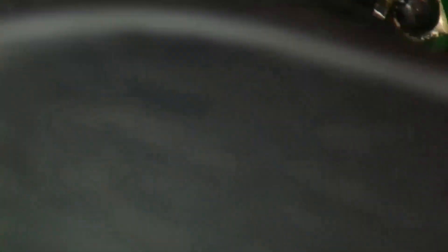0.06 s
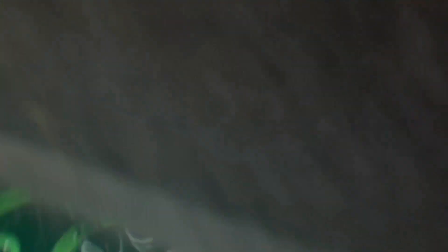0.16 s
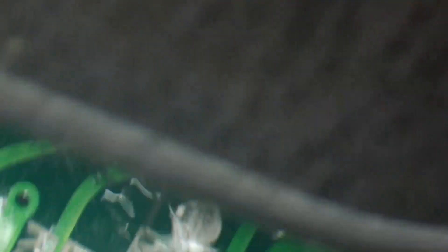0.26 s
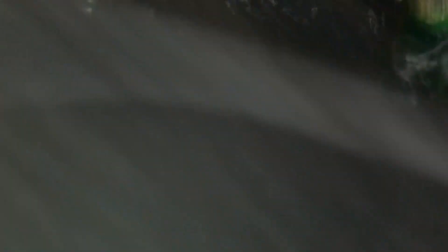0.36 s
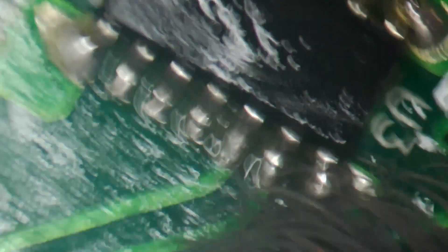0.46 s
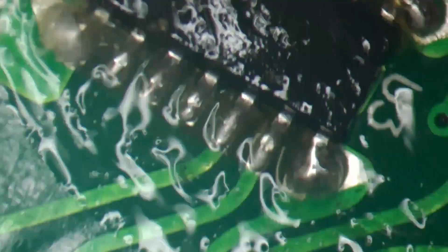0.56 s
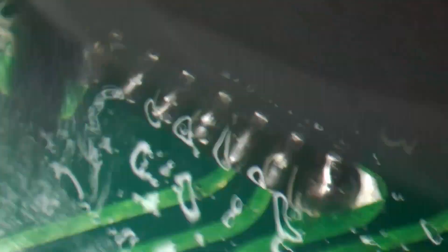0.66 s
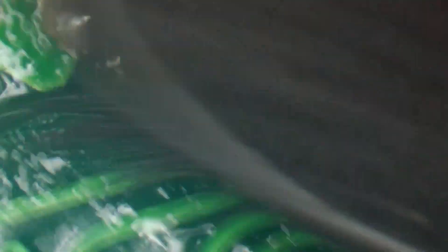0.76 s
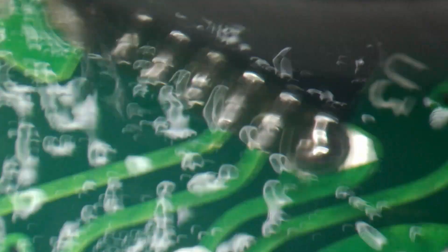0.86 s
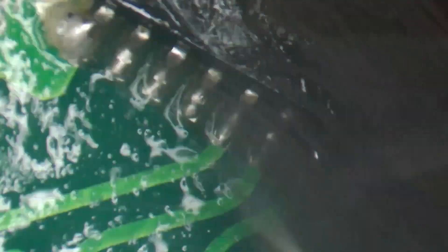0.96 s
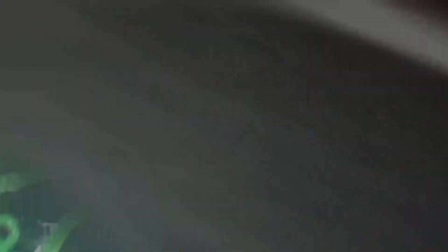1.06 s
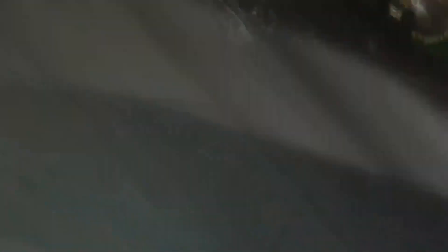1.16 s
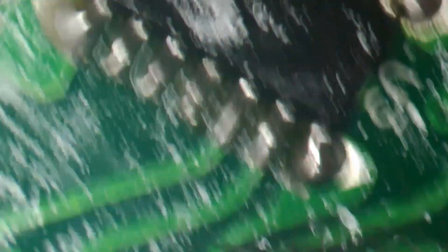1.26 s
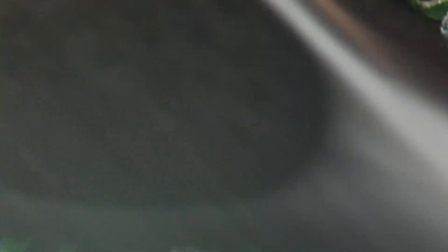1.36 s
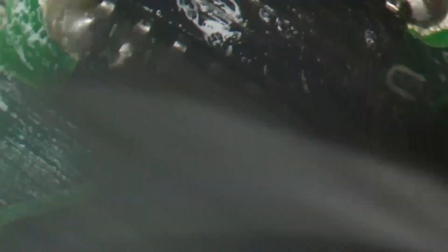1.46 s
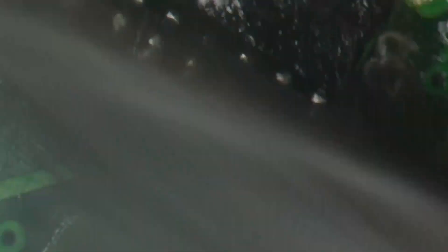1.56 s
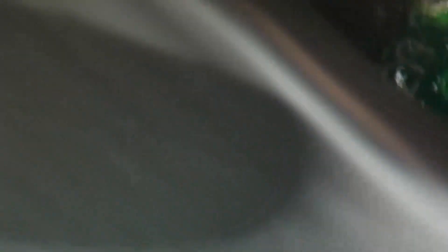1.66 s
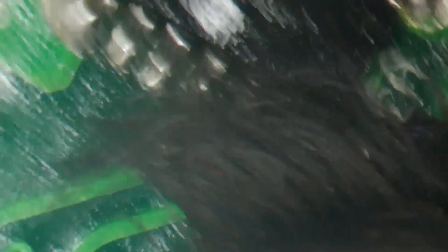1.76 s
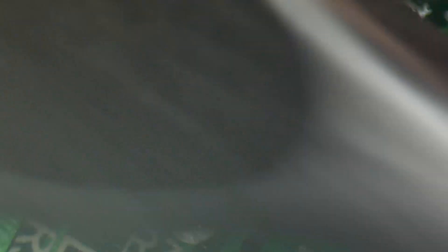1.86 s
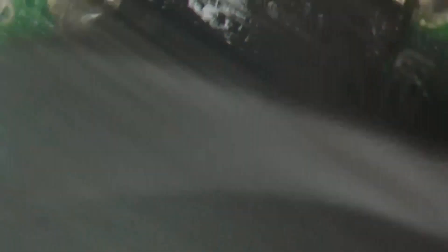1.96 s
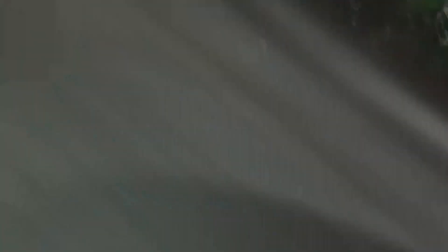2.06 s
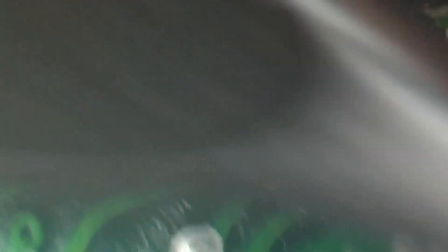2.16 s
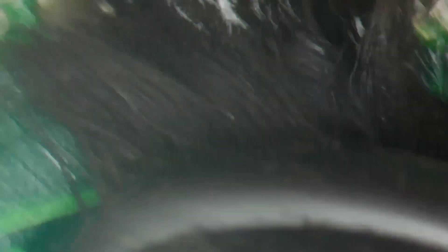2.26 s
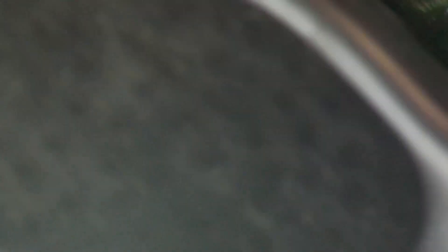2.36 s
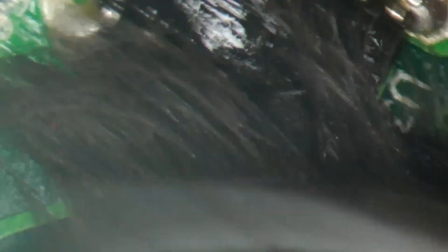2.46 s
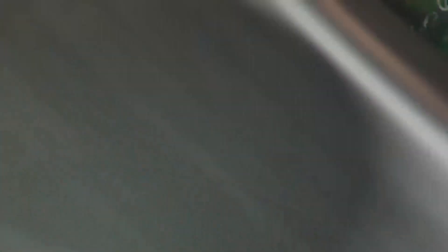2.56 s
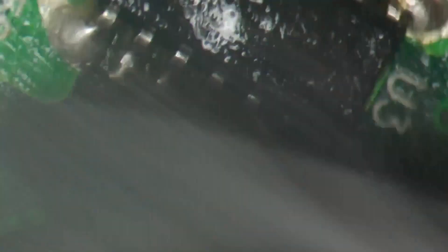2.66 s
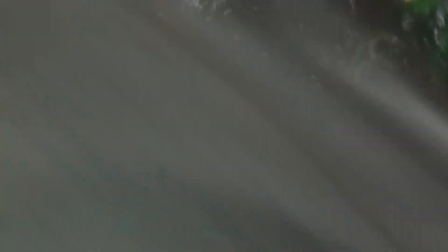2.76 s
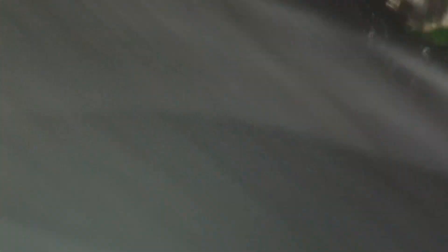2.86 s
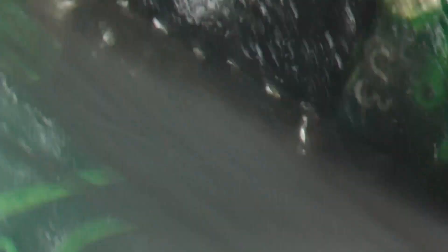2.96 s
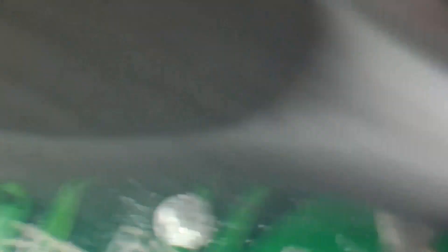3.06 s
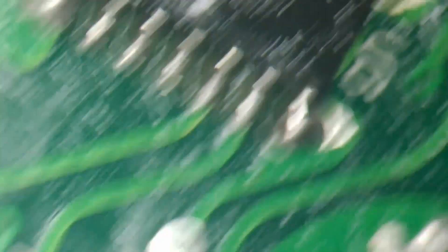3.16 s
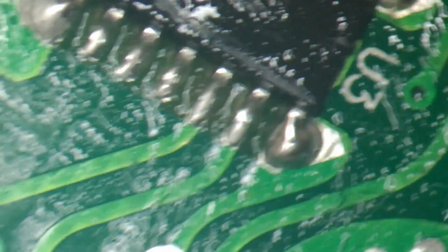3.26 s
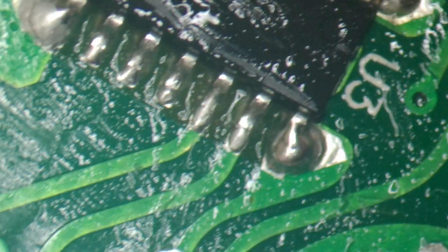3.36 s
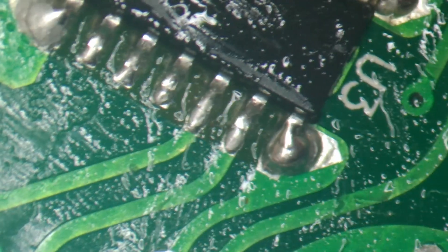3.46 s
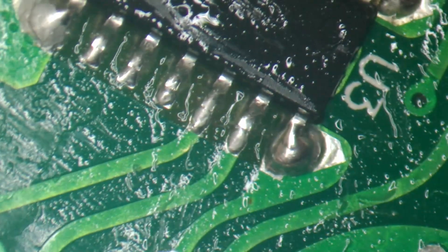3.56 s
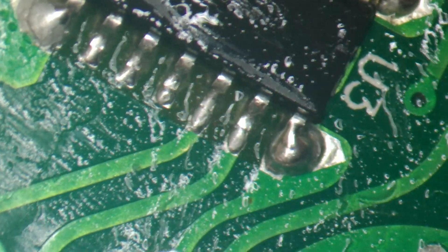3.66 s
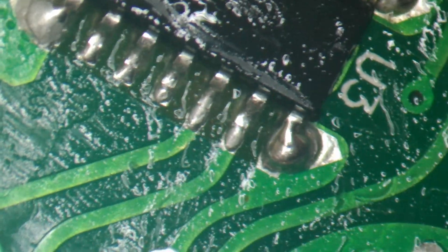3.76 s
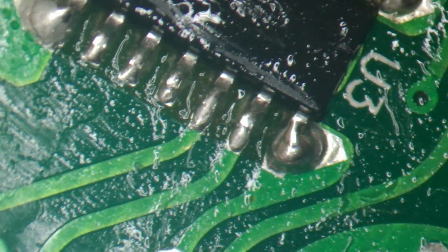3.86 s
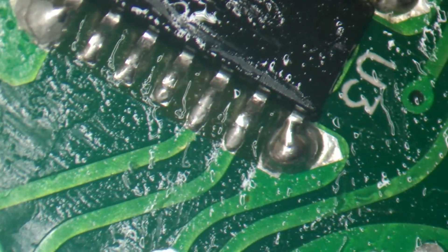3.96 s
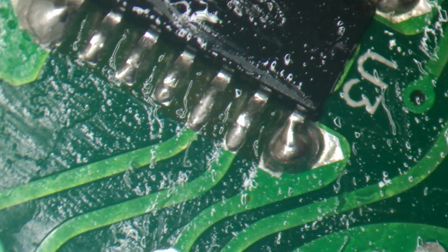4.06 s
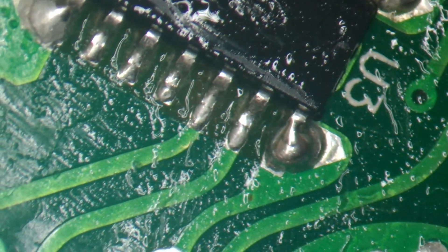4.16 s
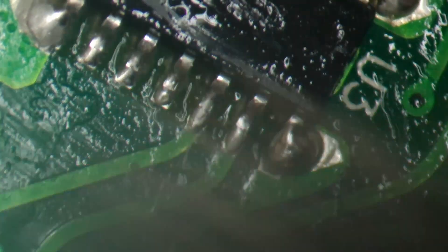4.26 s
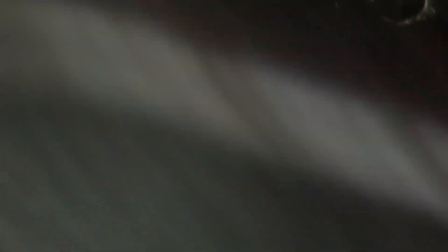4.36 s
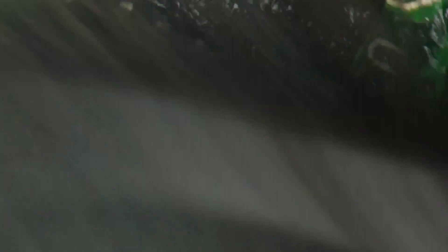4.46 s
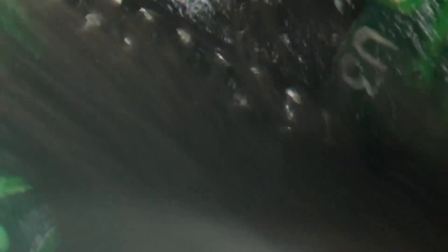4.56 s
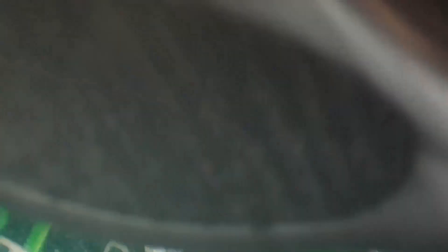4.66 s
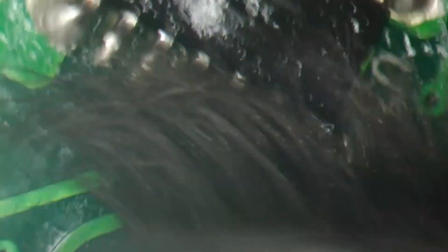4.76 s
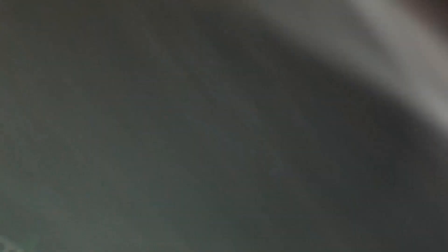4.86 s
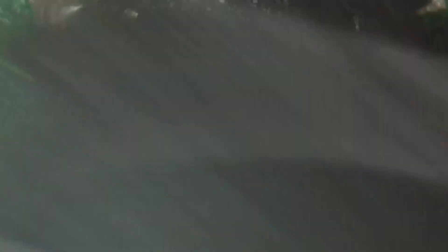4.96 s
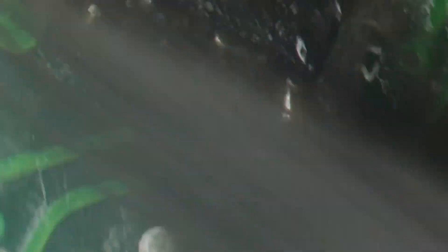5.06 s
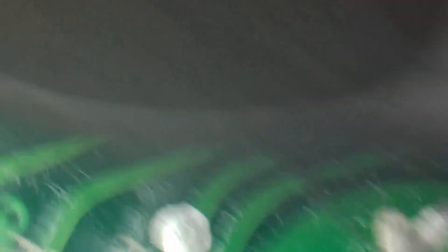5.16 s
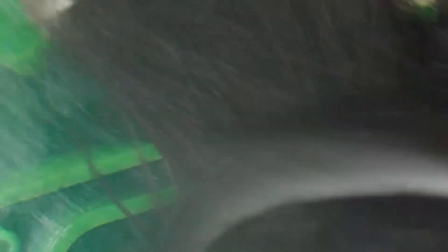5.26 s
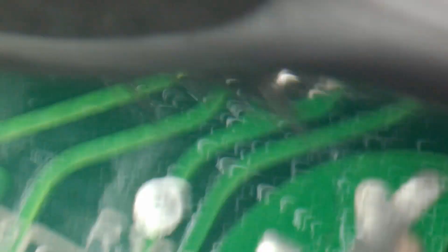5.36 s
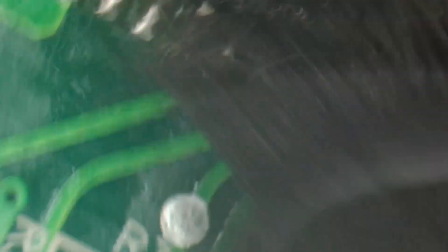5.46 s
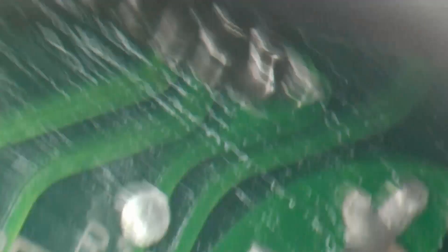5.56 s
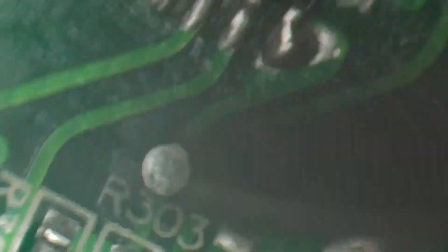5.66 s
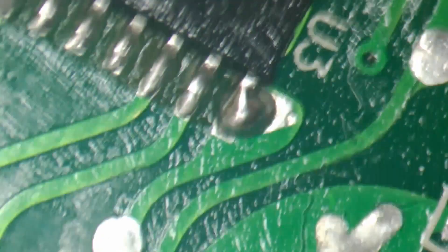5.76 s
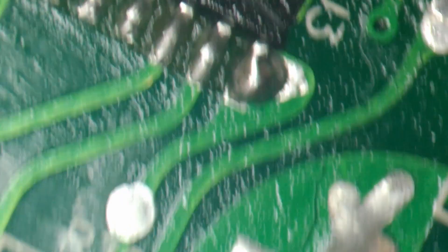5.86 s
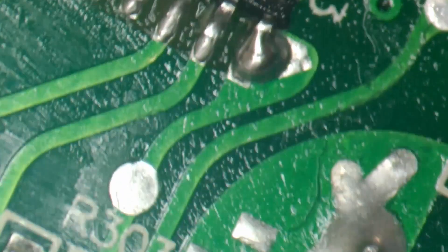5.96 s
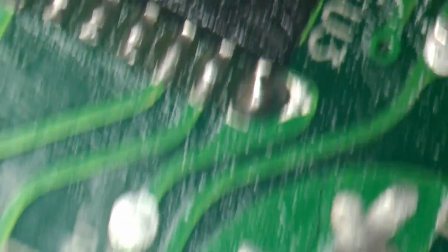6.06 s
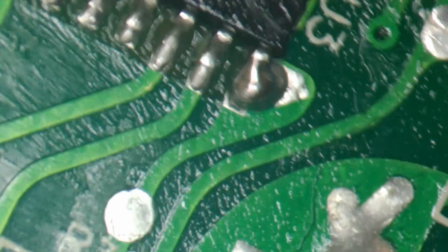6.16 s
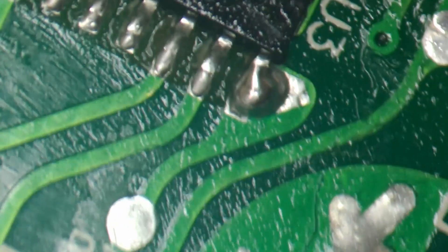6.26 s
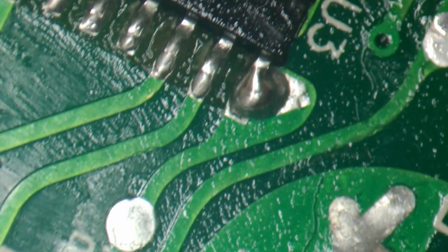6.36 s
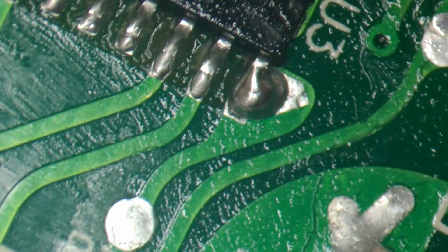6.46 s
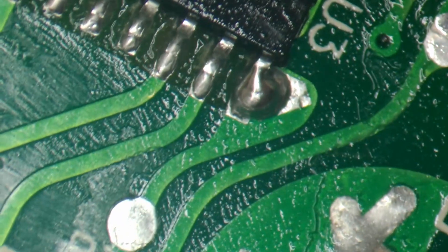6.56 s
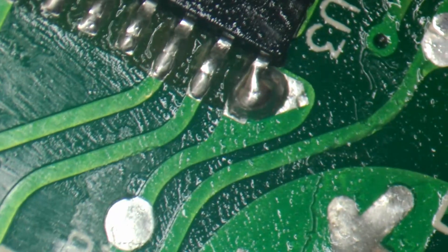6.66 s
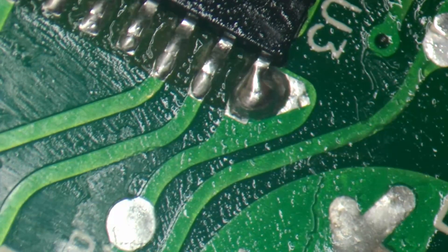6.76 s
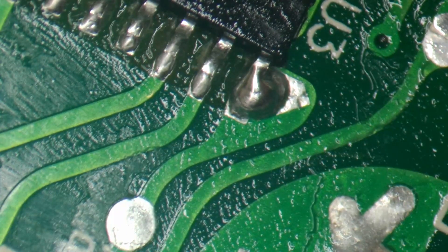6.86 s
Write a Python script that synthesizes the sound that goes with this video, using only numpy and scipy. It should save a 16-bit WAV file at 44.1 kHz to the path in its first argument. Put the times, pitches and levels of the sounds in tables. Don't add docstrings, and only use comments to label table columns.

```python
import sys
import numpy as np
from scipy import signal
from scipy.fft import rfft, irfft, next_fast_len
from scipy.io import wavfile
from scipy.ndimage import uniform_filter1d

SR = 44100
rng = np.random.default_rng(int(sys.argv[2]) if len(sys.argv) > 2 else 0)


def boost_factor(decibels):
    exponent = np.asarray(decibels, float) / 20
    return 10 ** exponent


def master(y):
    cut = np.clip(np.atleast_2d(y).T, -1, 1)
    pcm = np.round(cut * 32767)
    wavfile.write(sys.argv[1], SR, pcm.astype(np.int16))


N = 304731
TIME = np.arange(N) / SR


def rms_one(x):
    return x / np.sqrt(np.mean(x ** 2) + 1e-20)


def evened(x, span_s):
    return rms_one(x / np.sqrt(uniform_filter1d(x ** 2, size=int(span_s * SR)) + 1e-12))


def bandpass(x, order, edges_hz):
    return signal.sosfilt(signal.butter(order, edges_hz, "band", fs=SR, output="sos"), x)


def colour(x, points):
    size = next_fast_len(N + SR // 4)
    hz, db = np.transpose(points)
    grid = np.maximum(np.arange(size // 2 + 1) * SR / size, 1)
    cepstrum = irfft(np.log(boost_factor(np.interp(np.log(grid), np.log(hz), db))), size)
    cepstrum[1:size // 2] *= 2
    cepstrum[size // 2 + 1:] = 0
    return irfft(rfft(x, size) * np.exp(rfft(cepstrum)), size)[:N]


def resonance(x, hz, width_hz):
    r = np.exp(-np.pi * width_hz / SR)
    poles = [1, -2 * r * np.cos(2 * np.pi * hz / SR), r * r]
    return signal.lfilter([(1 - r * r) / 2, 0, (r * r - 1) / 2], poles, x + 1e-18)


def flutter(rate_hz, depth_db):
    lowpass = signal.butter(2, rate_hz, fs=SR / 32, output="sos")
    slow = rms_one(signal.sosfilt(lowpass, rng.standard_normal(N // 32 + 2)))
    return boost_factor(depth_db * np.interp(np.arange(N) / 32, np.arange(len(slow)), slow))


def body(x, modes, wander_db=0):
    out = np.zeros(N)
    for k, (hz, width_hz, db) in enumerate(modes):
        out += (-1) ** k * boost_factor(db) * resonance(x * flutter(9, wander_db), hz, width_hz)
    return out


def flicks(per_s, spread_db):
    sizes = boost_factor(spread_db * np.minimum(rng.exponential(1, N), 5)) * rng.choice([-1, 1], N)
    return rms_one(sizes * (rng.random(N) < per_s / SR))


# frequency in Hz, density in dB per Hz.
FLOOR = [(94, -28), (160, -8.5), (231, -8), (366, -8), (436, -15), (666, -17), (719, -22), (872, -17.5),
         (1100, -21.5), (2570, -23.5), (4000, -23.5), (4900, -27), (5600, -23.5), (7840, -24), (9700, -27),
         (10500, -32), (11400, -27.5), (16000, -33)]


def hush():
    return boost_factor(-67) * rms_one(colour(rng.standard_normal(N), FLOOR)) * flutter(8, depth_db=.3)


# time in seconds, level in dB.
ARM_WEIGHT = [(0, -67), (.6, -68), (.9, -62.5), (3.2, -60.5), (3.55, -66.5), (3.8, -69.5), (4.4, -68),
              (4.7, -65), (5.85, -56.5), (6.0, -62), (6.15, -59), (6.25, -66.5), (6.91, -62)]
# time in seconds, bench top level in dB, frame level re top in dB.
SHOVES = [(.25, -64, -1), (.4, -64, -2), (.75, -51.5, -6.5), (.84, -48, -11), (1.06, -48, -18),
          (1.22, -49.5, -2), (1.37, -57.5, -3), (1.5, -57, -0.5), (1.59, -48.5, -10), (1.73, -58, -1),
          (1.84, -49.5, -5), (2.0, -55, -4), (2.15, -57, -9), (2.329, -45, -3), (2.579, -47.5, -12),
          (2.8, -47, -19), (3.02, -46, -17), (3.27, -50, -7), (4.66, -56.5, -5), (4.79, -47.5, 0),
          (4.89, -54.5, -7), (5.0, -50, -2.5), (5.14, -49.5, -12), (5.25, -50, -16), (5.33, -49.5, -10),
          (5.43, -50, -10), (5.61, -41.5, -14), (5.79, -45, 4.5), (6.72, -49, -21), (6.81, -48, -27)]
# frequency in Hz, width in Hz, level in dB.
BENCH_TOP = [(136.3, 24.4, 10.5), (191, 73, -7), (277, 86, -16)]
# frequency in Hz, width in Hz, level in dB.
BENCH_FRAME = [(37.5, 23, -15.5), (58, 5.4, -2.5), (77, 30.5, -6.5)]


def bench():
    rise_db_per_s, fall_db_per_s, frame_lingers = 256, 193, 0.62
    lean = boost_factor(np.interp(TIME, *np.transpose(ARM_WEIGHT)))
    top_power = (boost_factor(-4) * lean) ** 2
    frame_power = lean ** 2
    for s, top_db, frame_db in SHOVES:
        near = slice(max(int((s - .25) * SR), 0), int((s + .35) * SR))
        ago = TIME[near] - s
        loss_db = np.where(ago < 0, -rise_db_per_s, fall_db_per_s) * ago
        top_power[near] += boost_factor(top_db - loss_db) ** 2
        frame_power[near] += boost_factor(top_db + frame_db - frame_lingers * loss_db) ** 2
    top = evened(body(flicks(500., spread_db=2.0), BENCH_TOP), span_s=0.22)
    frame = evened(body(flicks(500., spread_db=2.0), BENCH_FRAME), span_s=0.22)
    return np.sqrt(top_power) * top + np.sqrt(frame_power) * frame


# time in seconds, level in dB.
NUDGES = [
    [(0.08, -82), (0.256, -58), (0.288, -65.5), (0.354, -55.5), (0.364, -44), (0.394, -64.5),
     (0.452, -67.5), (0.478, -98.5), (0.5, -77)],
    [(5.92, -76), (6.032, -76), (6.052, -65), (6.092, -80), (6.124, -58), (6.13, -67), (6.182, -58.5),
     (6.216, -81), (6.4, -80)],
]
# frequency in Hz, density in dB per Hz.
DRAG_SPECTRA = [
    [(150, -52), (250, -29), (360, -0.5), (449, -20), (513, -11.5), (1440, -5.5), (2590, -22.5),
     (3060, -16), (5020, -30), (9000, -30), (11700, -37), (19800, -120)],
    [(150, -49), (250, -8), (323, -2), (398, -12), (442, -9), (770, -16), (1700, 0.5), (2370, -24.5),
     (3150, -7.5), (9000, -30.5), (11700, -54), (19800, -120)],
]


def slides():
    grit = flicks(1500., spread_db=3.0)
    out = np.zeros(N)
    for rows, spectrum in zip(NUDGES, DRAG_SPECTRA):
        gain = boost_factor(np.interp(TIME, *np.transpose(rows), left=-120, right=-120))
        out += rms_one(colour(grit, spectrum)) * gain
    return out


def room(x):
    t60_s, wall_cut_hz = 0.27, 9300
    size = next_fast_len(N + SR)
    turn = -2j * np.pi * np.arange(size // 2 + 1) / size
    wall = 1 / (1 - turn * SR / (2 * np.pi * wall_cut_hz))
    response = 0
    for k, lag_s in enumerate(rng.uniform(.011, .04, 10)):
        loop = boost_factor(-60 * lag_s / t60_s) * wall * np.exp(turn * lag_s * SR)
        response = response + (-1) ** k * loop / (1 - loop)
    return irfft(rfft(x, size) * response, size)[:N]


# time in seconds, peak in dB, low weight in dB,
# brightness of the tick in dB.
CATCHES = [(.361, -41, -9, -8), (.502, -58, -18, 11), (.719, -28.5, -13, 2), (.818, -28.5, -21, -6),
           (1.001, -31.5, -22, 0), (1.049, -28, -18, 3), (1.186, -36.5, -21, -4), (1.208, -34, -27, -5),
           (1.369, -35, -24, 0), (2.097, -39.5, -22, 2), (2.174, -39, -33, 10), (2.22, -36, -27, 0),
           (2.287, -31, -18, -6), (2.296, -33, -8, -8), (2.314, -40.5, 1.5, 0), (2.324, -40.5, 6, -5),
           (2.503, -35.5, -7, 0.5), (2.698, -37, -36, 0), (2.816, -34, -32, 0), (2.902, -35, -18, 0),
           (2.929, -33, -23, 4), (3.242, -40, -9, 0), (4.666, -37.5, -14, -3), (4.73, -31, -17, -2),
           (4.86, -41, -17, -1), (4.986, -31, -29, 5), (5.233, -35, -17, 0), (5.244, -32, -24, -3),
           (5.526, -33.5, -13, 2), (5.559, -26, -14, -3), (5.741, -26, -12.5, 6), (5.751, -25, -13, -6),
           (5.794, -23, -18, -1), (5.798, -23, -18, 10), (5.81, -32, -17, -3), (6.119, -44, -46, -2)]
# frequency in Hz, width in Hz, level in dB.
BOARD = [(917, 136, -3), (998, 146, 1.3), (1193, 46, -4), (1373, 50, -3.5), (1572, 270, -12),
         (1852, 130, -5), (2080, 123, -1), (2540, 310, -4.5), (2594, 290, -9), (3100, 370, -9.5)]
# frequency in Hz, width in Hz, level in dB.
HANDLE = [(245, 110, -5.5), (329.4, 62, 2), (397, 66, -5.5), (487, 86, -12.5), (666, 83, 1.5)]


def catches():
    tick_db, tick_follows, weight_blunts = -54.5, 0.41, 0.55
    sharp, heavy, tick = np.zeros((3, N))
    length = int(.05 * SR)
    t = TIME[:length]
    for s, db, low_db, bright_db in CATCHES:
        decay_s = 0.0026 * boost_factor(.5 * (db + 38.0))
        scrunch = rng.choice([-1, 1], length) * rng.uniform(.4, 1.39, length) * np.exp(-t / decay_s)
        this_tick_db = bright_db + tick_db + tick_follows * (db + 28) - weight_blunts * max(low_db + 15, 0)
        at = int(s * SR)
        sharp[at:][:length] += boost_factor(db) * scrunch
        heavy[at:][:length] += boost_factor(db + low_db) * scrunch
        tick[at:][:length] += boost_factor(this_tick_db) * scrunch * np.exp(-t / 0.0044)
    tick = bandpass(tick, 2, [1500, 9000])
    sharp = signal.sosfilt(signal.butter(1, 1150, fs=SR, output="sos"), sharp)
    return boost_factor(15) * body(sharp, BOARD) + boost_factor(20.0) * body(heavy, HANDLE) + boost_factor(6.5) * tick


# fastest moment in seconds, half length in seconds, hiss in dB, pressure on the pins in dB.
STROKES = [(0.562, 0.049, -62.5, 3.5), (0.722, 0.044, -56, 5), (0.836, 0.042, -55, 7),
           (0.985, 0.04, -56, 3.5), (1.09, 0.04, -53.5, 4.5), (1.228, 0.036, -53.5, 2),
           (1.365, 0.038, -57, 1.5), (1.496, 0.043, -53.5, 2), (1.622, 0.038, -56.5, 3),
           (1.75, 0.04, -53.5, 2.5), (1.872, 0.041, -55, 1), (1.999, 0.035, -53.5, 2.5),
           (2.119, 0.04, -54, 2.5), (2.24, 0.04, -53, 2), (2.357, .042, -56, 5.5),
           (2.488, 0.042, -57.5, 4.5), (2.598, 0.03, -54.5, 4.5), (2.711, 0.034, -54.5, 2.5),
           (2.824, 0.033, -53.5, 3), (2.935, 0.031, -50.5, 0), (3.042, 0.036, -55, 3.5),
           (3.162, 0.034, -54, 3.5), (3.287, 0.039, -50, 2.5), (3.395, .06, -76, 1.5),
           (4.541, 0.029, -68.5, 2.9), (4.655, 0.031, -57, 3.3), (4.762, 0.035, -52.5, 3.1),
         (4.894, 0.04, -55.5, 4.7), (5.018, .033, -53.5, 3.6), (5.135, 0.038, -53, 3.8),
         (5.258, 0.037, -53.5, 4.1), (5.375, 0.033, -52.5, 4), (5.489, 0.036, -52.5, 3.4),
         (5.602, 0.036, -50.5, 4.7), (5.711, 0.029, -52.5, 0.66), (5.756, 0.015, -57.5, 18.6),
         (5.812, 0.027, -53.5, 8.9), (5.85, 0.033, -54.5, 0.81)]


def stroke_gains(roundness):
    rise_share = 0.97
    power = np.zeros((3, N))
    for s, half_s, hiss_db, press_db in STROKES:
        near = slice(int((s - .3) * SR), int((s + .3) * SR))
        ago = TIME[near] - s
        reach_s = half_s * np.where(ago < 0, rise_share, 2 - rise_share)
        speed_db = -6 * np.abs(ago / reach_s) ** roundness
        handle_db = -5 + 0.34 * (press_db - 5.5) + 0.64 * (hiss_db + 52.5)
        power[:, near] += boost_factor(hiss_db + speed_db + np.array([[0], [press_db], [handle_db]])) ** 2
    return np.sqrt(power)


# frequency in Hz, density in dB per Hz.
HISS = [(1760, -25.5), (3000, -7.5), (3330, -4.5), (3820, -8), (4610, -5.5), (5040, 0.5), (8130, -7.5),
        (10300, -12.5), (11200, -8), (15700, -13)]
# frequency in Hz, width in Hz, level in dB.
TUFTS = [(4390, 250, -6), (6080, 180, -10), (6350, 98, -22), (7890, 370, -5), (9520, 500, -1),
         (10880, 540, -4), (13020, 330, -28)]


def brush():
    hiss_gain, board_gain, handle_gain = stroke_gains(roundness=2.0)
    tips = flicks(14000., spread_db=1.5)
    patchy = np.zeros(N)
    for edges_hz in ([1500, 5000], [5000, 7500], [7500, 10300], [10300, 18000]):
        patchy += bandpass(tips, 2, edges_hz) * flutter(7.3, depth_db=0.5)
    lifted = patchy + boost_factor(1.5) * body(tips, TUFTS, wander_db=5.0)
    hiss = evened(colour(lifted, HISS), span_s=0.089) * flutter(40, depth_db=1.0)
    trips = flicks(3500., spread_db=3.5) * flutter(64, depth_db=1.0)
    board = evened(body(trips, BOARD, wander_db=3.0), span_s=0.045)
    handle = evened(body(trips, HANDLE, wander_db=3.0), span_s=0.045)
    return boost_factor(1.5) * hiss_gain * hiss + board_gain * board + boost_factor(-3.5) * handle_gain * handle


# time in seconds, peak in dB.
SNAPS = [(0.5013, -54), (0.5208, -48), (0.5357, -48), (0.5707, -46), (0.6774, -46), (0.6949, -44),
         (0.7173, -35), (0.8141, -40), (0.9648, -41), (1.0451, -40), (1.1878, -46), (1.3434, -45),
         (1.3694, -42), (1.4522, -48), (1.4671, -44), (1.5988, -43), (1.7186, -44), (1.8323, -47),
         (1.957, -42), (2.176, -45), (2.2199, -39), (2.4614, -44.5), (2.604, -34.5), (2.6779, -46),
         (2.6973, -41), (2.7901, -42), (2.8425, -37), (2.9004, -41), (2.9293, -33), (3.1224, -47),
         (3.2416, -44), (3.2526, -40), (3.275, -32), (4.606, -47), (4.7307, -37), (4.8604, -45),
         (4.9652, -51), (4.9861, -42), (5.0979, -48), (5.1168, -46), (5.2091, -45), (5.2316, -39),
         (5.3648, -38), (5.4501, -38), (5.487, -41), (5.5593, -44), (5.7225, -38), (5.7429, -31),
         (5.7763, -41), (5.7943, -31)]
# time in seconds, peak in dB.
CRACKS = [(6.4228, -25.5), (6.539, -37), (6.62, -46), (6.678, -44), (6.7005, -38), (6.7165, -26),
          (6.7256, -14), (6.7264, -16), (6.7285, -18), (6.7895, -25), (6.8345, -27)]


def snaps():
    length = int(.008 * SR)
    tail = np.exp(-TIME[:length] / 0.00079)
    out = np.zeros(N + SR)
    for s, db in [(s, db - 4) for s, db in SNAPS] + CRACKS:
        out[int(s * SR):][:length] += boost_factor(db) * rng.choice([-1, 1], length) * tail
    return boost_factor(2.0) * bandpass(out[:N], 3, [1300, 6500])


# time in seconds, peak in dB, rattle t60 in seconds, treble re rattle in dB,
# ring re rattle in dB.
CLATTER = [(6.4219, -27.5, 0.026, 2.5, -7), (6.4226, -22.5, 0.17, 6.5, -1), (6.432, -31, 0.038, 8, -10),
           (6.44, -29, 0.21, 9.5, -23), (6.47, -42, .8, 2, -36), (6.472, -30, .04, -10, -15),
           (6.536, -38.5, 0.1, -4, -22), (6.598, -44.5, 0.28, -12, -3), (6.621, -45.5, 0.03, -7, -17),
           (6.676, -45.5, .018, 2, -9), (6.7, -28, 0.14, -2, -14), (6.708, -45, 0.14, -4, 7),
           (6.714, -25, 0.037, 6, -2), (6.7242, -28, 0.012, 11, 0), (6.7252, -25.5, 0.071, 14, 6),
           (6.737, -32, 0.25, 12.5, 8), (6.751, -42, 0.033, 8, -4), (6.788, -22.5, 0.043, 1, -7),
           (6.791, -22, 0.16, -7, -13), (6.8345, -37, 0.011, 6, -18), (6.836, -23.5, 0.029, -21, -23),
           (6.845, -42, 0.23, -20, -27)]
# frequency in Hz, density in dB per Hz.
TRAY_SPECTRA = [
    [(59, -46), (100, -27), (147, 1), (255, -20), (335, -10), (560, -10.5), (820, -17), (1100, -3.5),
     (1610, -3), (4500, -12), (5300, -19), (6840, -17), (8000, -23), (11400, -37), (13200, -29),
     (14200, -48)],
    [(59, -52), (100, -12), (143, -4.5), (260, -16), (343, -3.5), (662, -9), (768, -6), (1650, -4.5),
     (1800, -8.5), (7610, -18), (8640, -25), (11500, -23), (16000, -31)],
]
# frequency in Hz, level at the first landing in dB, level at the second in dB,
# t60 in seconds.
TRAY_MODES = [(580, -26, -34, 0.06), (1027, -11, -18, 0.27), (1137, -4, -9, 0.1), (1261, 1, -2.5, 0.09),
              (1650, -9, -20, 0.14), (1603, -9, -16, 0.13), (2030, -18, -23, 0.16), (2730, -8, -10, 0.14),
              (3180, 3, -4.5, 0.055), (3665, -2, 0, 0.035), (4330, -6, -4, 0.016), (4556, -12, -9, 0.045),
              (5975, -8, -17, 0.06), (6890, -9, -18, 0.07), (8460, -12, -3.5, 0.13), (9430, -6, -22, 0.05),
              (10010, -20, -15, 0.2), (10600, -18.5, -31, 0.39), (12700, -9, -8.5, 0.09),
              (13260, -13, -18, 0.11), (15340, -23, -18, 0.13)]


def tray():
    start = int(6.4 * SR)
    t = TIME[start:]
    low, high = np.zeros((2, len(t)))
    drives = np.zeros((len(TRAY_MODES), len(t)))
    high_modes = np.array(TRAY_MODES)[:, :1] > 5000
    for s, db, t60, treble_db, ring_db in CLATTER:
        ago = np.maximum(t - s, 0)
        rise_s = 0.0006 + 0.2 * t60 ** 2
        rattle = boost_factor(db - 60 * ago / t60) * (1 - np.exp(-ago / rise_s))
        low += rattle
        high += boost_factor(treble_db - 35 * ago / t60) * rattle
        dull_db = 0.47 * min(treble_db, 0) * high_modes
        uneven_db = 2.2 * rng.standard_normal((len(TRAY_MODES), 1))
        drives += boost_factor(ring_db - 33.5 + dull_db + uneven_db) * rattle

    grit = flicks(16000., spread_db=1.86)
    bass = signal.sosfilt(signal.butter(2, 4600, fs=SR, output="sos"), grit[start:])
    rattle = np.zeros(N)
    rattle[start:] = (low - high) * bass + high * grit[start:]
    first_landing = TIME < 6.69
    out = np.zeros(N)
    for landing, spectrum in zip((first_landing, ~first_landing), TRAY_SPECTRA):
        out += boost_factor(-4.0) * colour(rattle * landing, spectrum) / np.std(colour(grit, spectrum))

    for drive, (hz, first_db, second_db, t60) in zip(drives, TRAY_MODES):
        r, w = boost_factor(-60 / (t60 * SR)), 2 * np.pi * hz / SR
        push = boost_factor(np.where(first_landing[start:], first_db, second_db)) * drive * grit[start:]
        out[start:] += signal.lfilter([0, np.sin(w)], [1, -2 * r * np.cos(w), r * r], push + 1e-18)
    return out


def scene():
    near = brush() + catches() + slides() + tray() + snaps()
    background = hush()
    return (near + boost_factor(-16.5) * room(near) + bench() + background)[None]


# frame number, at 1024 / 48000 seconds a frame.
STARVED = [1, 70, 75, 85, 87, 94, 99, 101, 112, 117, 118, 119, 124, 125, 135, 154, 168, 173, 175, 231, 264,
           268, 274, 281, 302]


def starve(x, step_db, tilt_db):
    hop, first_s = 941, -.0046
    n = np.arange(2 * hop)
    window = np.sin(np.pi * (n + .5) / (2 * hop))
    basis = np.cos(np.pi / hop * np.outer(np.arange(hop) + .5, n + .5 + hop / 2)) * window
    coarse = boost_factor(step_db + tilt_db * np.sqrt(np.arange(hop) / hop))
    x = np.r_[np.zeros(hop), x]
    out = x.copy()
    for frame in STARVED:
        at = int((first_s + frame * 1024 / 48000) * SR)
        lines = basis @ x[at:at + 2 * hop]
        step = coarse * np.sqrt(uniform_filter1d(lines ** 2, size=60))
        if np.std(lines) > .2:
            step[:160] *= .55
        lost = lines - step * np.round(lines / step)
        lost[:12] = 0
        out[at:at + 2 * hop] -= 2 / hop * lost @ basis
    out = np.where(abs(TIME - 6.42) < .007, x[hop:], out[hop:])

    empty_from_s, empty_to_s = 6.428, 6.525
    band_edges = signal.butter(8, (13700, 15000), "band", fs=SR, output="sos")
    band = signal.sosfiltfilt(band_edges, out[-SR:])
    inside_s = np.minimum(TIME[-SR:] - empty_from_s, empty_to_s - TIME[-SR:])
    out[-SR:] -= band * np.clip(inside_s / .008, 0, 1)
    return out


def top_cut(x):
    return signal.sosfilt(signal.butter(12, 16530, fs=SR, output="sos"), x)


def record(dry):
    thinned = starve(dry[0], step_db=10.5, tilt_db=6.5)
    cut = signal.sosfilt(signal.cheby2(12, 60, 16500, fs=SR, output="sos"), thinned)
    return top_cut(cut[None])


dry = scene()
out = record(dry)
master(out)
```